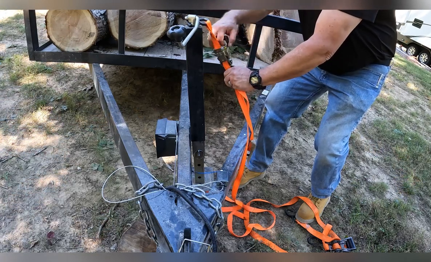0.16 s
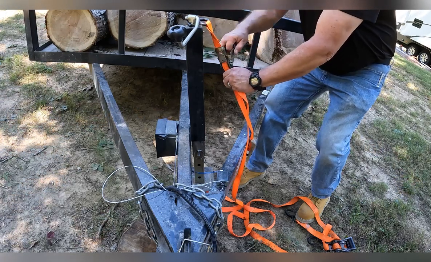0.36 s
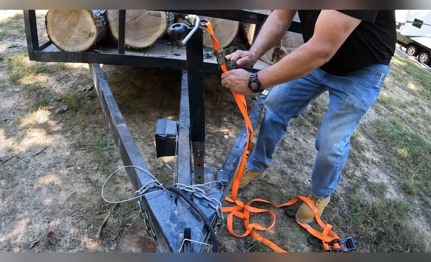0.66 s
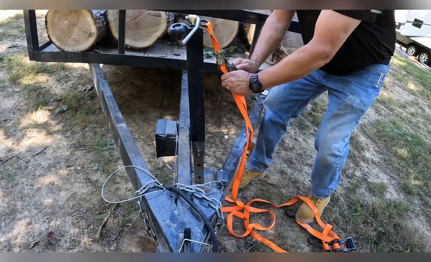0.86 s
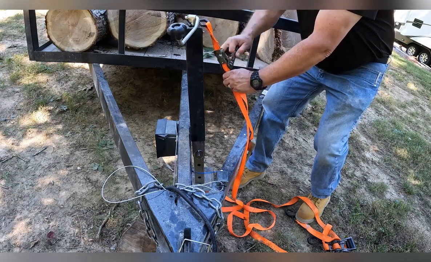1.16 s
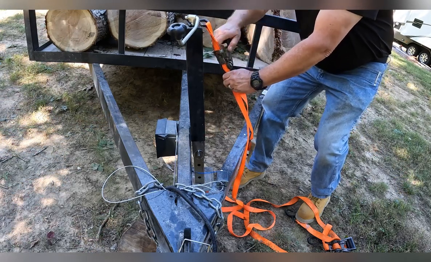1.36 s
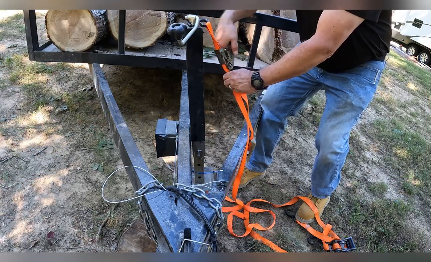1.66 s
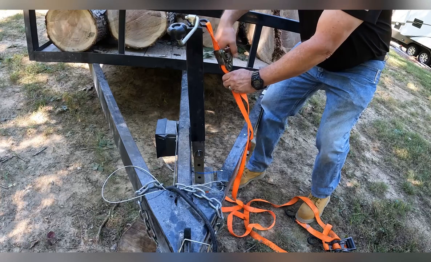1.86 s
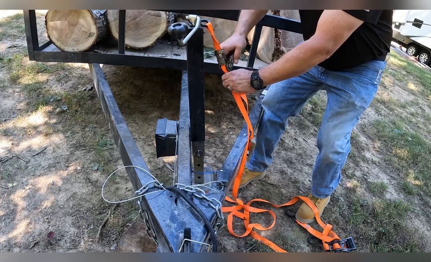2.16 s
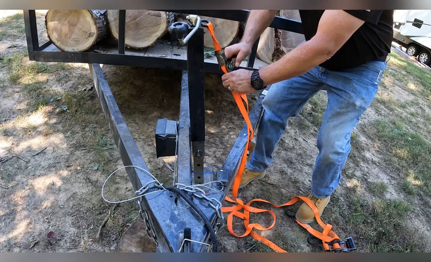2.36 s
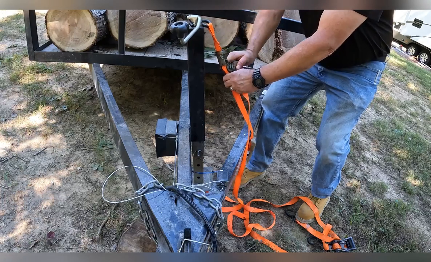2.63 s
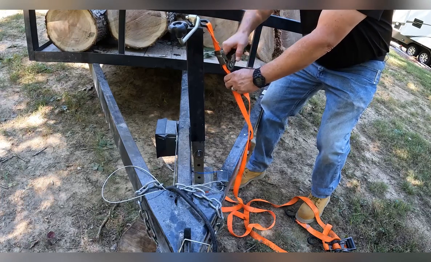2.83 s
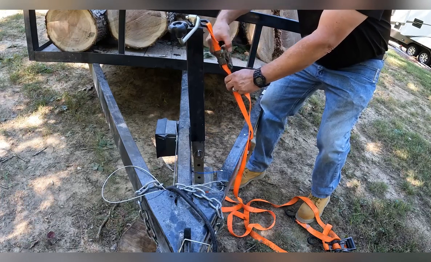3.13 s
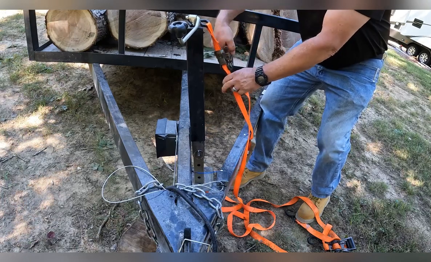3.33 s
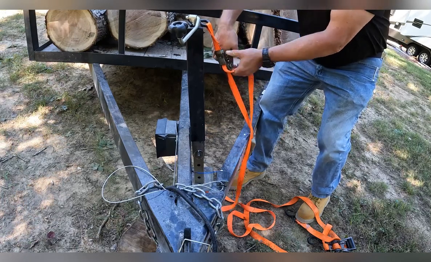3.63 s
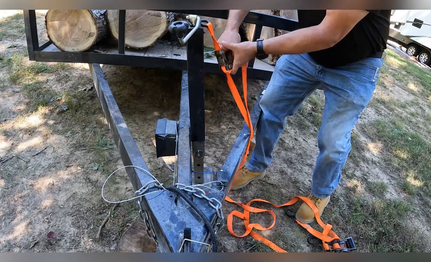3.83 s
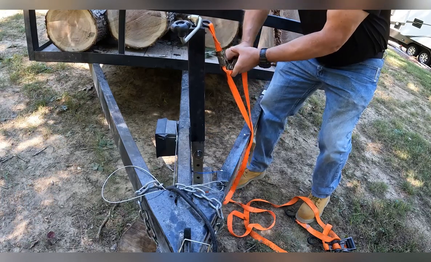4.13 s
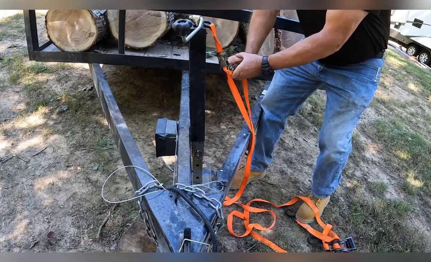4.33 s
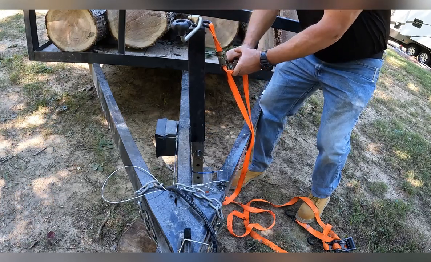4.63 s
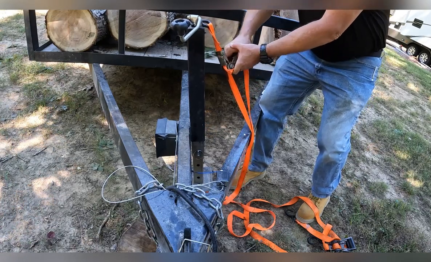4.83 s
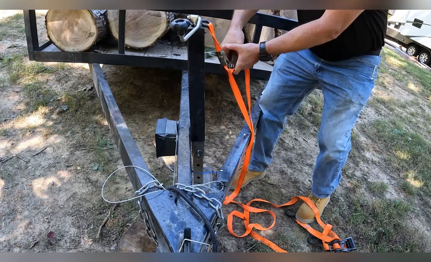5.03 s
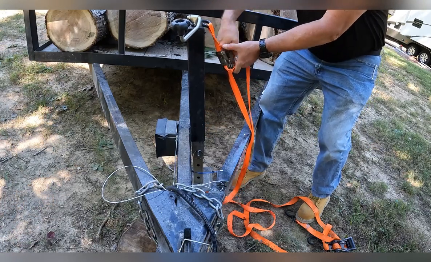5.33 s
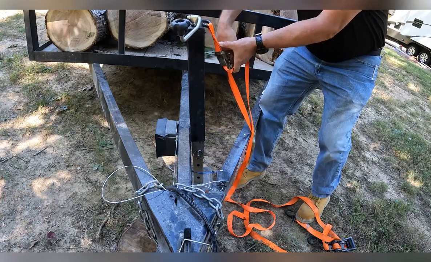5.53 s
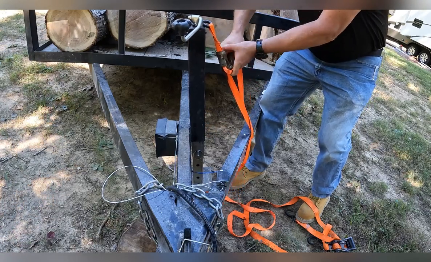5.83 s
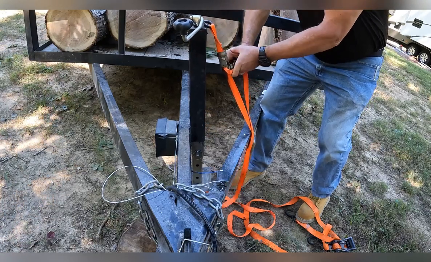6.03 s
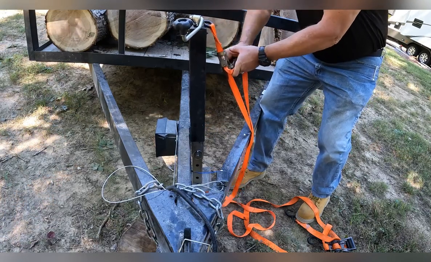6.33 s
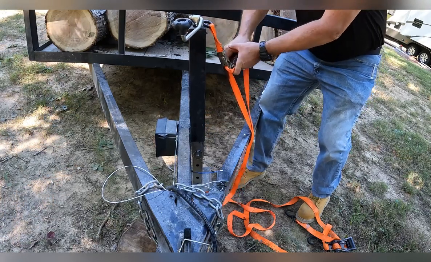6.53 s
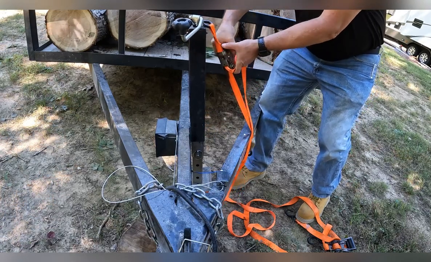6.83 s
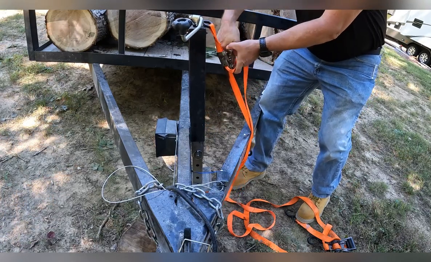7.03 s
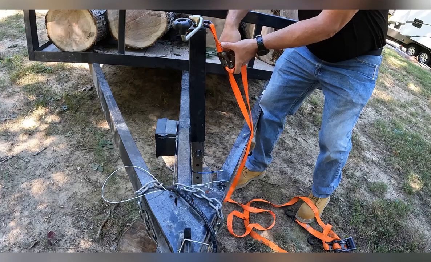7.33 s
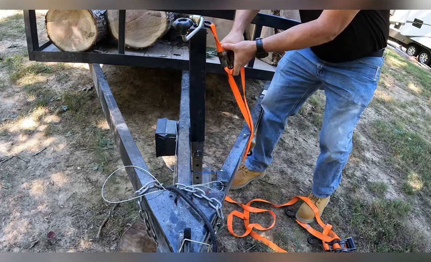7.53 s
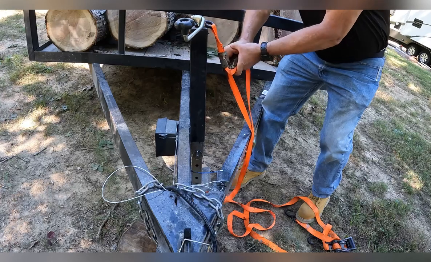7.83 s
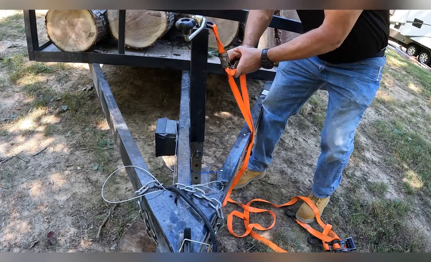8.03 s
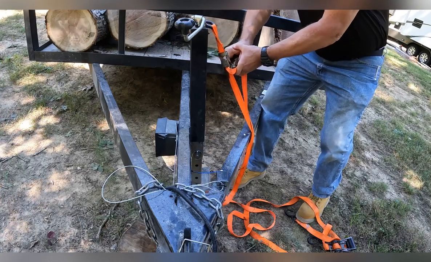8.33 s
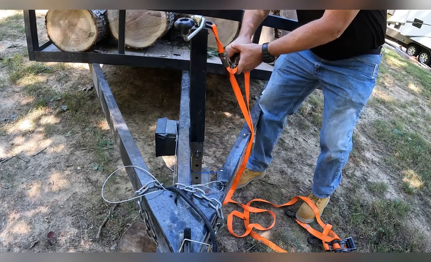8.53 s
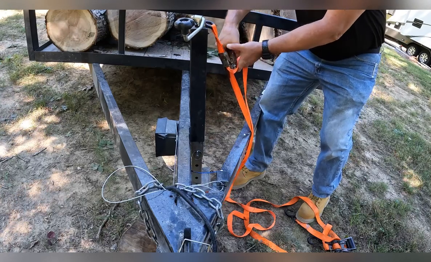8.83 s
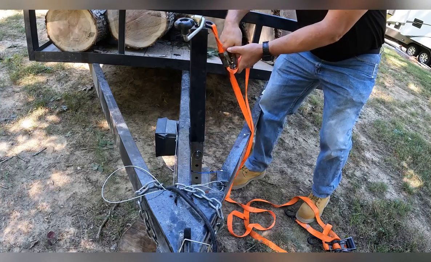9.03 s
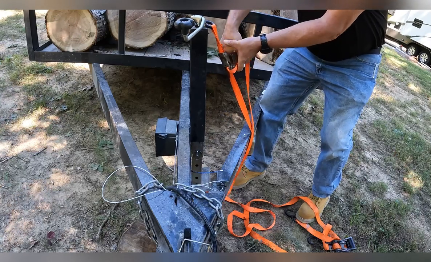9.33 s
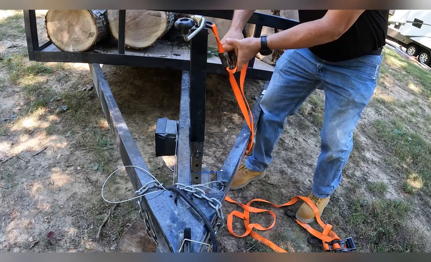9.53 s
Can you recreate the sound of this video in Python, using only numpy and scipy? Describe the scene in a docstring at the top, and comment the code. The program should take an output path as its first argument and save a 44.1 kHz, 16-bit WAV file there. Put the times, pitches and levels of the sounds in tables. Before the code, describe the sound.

Outdoors, about a metre from the microphone, a ratchet strap is tightened on a log trailer. A short scuff and two quick steel clicks lead to single clicks roughly a second apart, some doubled. Later ones shake the trailer with dull clanks and rough strap twangs, with small ticks and handle knocks between. Wind thumps the microphone in bursts over a faint distant hum and thin insect trill.

```python
"""A short scuff and two sharp steel clicks, then more clicks at a slower pace: a ratchet strap is cranked
tight on a log trailer, outdoors, about a metre from the microphone. Pawls snapping over the teeth are noise
bursts and damped modes of the steel buckle; each snap also shakes the strap and the trailer frame, which ring.
Gusts buffet the microphone as low noise and swings of pressure with flutter. Far off, a machine hums on two
notes and insects trill and rasp faintly over soft outdoor noise."""
import sys
import numpy as np
from scipy import signal
from scipy.fft import rfft, irfft, next_fast_len
from scipy.io import wavfile
from scipy.ndimage import uniform_filter1d

SR = 44100
rng = np.random.default_rng(int(sys.argv[2]) if len(sys.argv) > 2 else 0)


def int16_out(signal):
    """Quantize to a 16-bit WAV file."""
    q = np.round(np.clip(np.atleast_2d(signal).T, -1, 1) * 32767)
    wavfile.write(sys.argv[1], SR, q.astype(np.int16))


N = 426888
TIME = np.arange(N) / SR  # seconds
AGE = np.arange(SR // 2) / SR  # seconds since a blow

# The ratchet passes a tooth. Each row: time in seconds, relative level in dB, treble in dB, lag of the second
# pawl in seconds, relative jolt to the frame in dB, scrape up the tooth relative to the click in dB,
# three notes of the buckle in Hz with the strongest first, hollow note of the handle in Hz.
TEETH = [(0.0842, -17.5, 7.2, 0.00072, -48, -19, 4250, 6440, 3360, 1290),
         (0.1645, -19.5, 7.1, 0.00062, -45.5, -26.5, 5380, 4370, 6670, 1260),
         (0.4905, -19, 4.2, 0.0023, -43, -30.5, 6400, 4840, 3210, 1266),
         (0.7734, -20.5, 3.5, 0.0091, -41, -32, 5300, 7364, 2900, 1036),
         (1.2205, -19, 7.4, 0.00087, -47.5, -23.5, 3210, 4510, 2060, 1280),
         (1.3065, -18.5, 7.6, 0.0011, -47, -26, 7440, 3820, 4870, 1130),
         (2.236, -18.5, 3.4, 0.0071, -39.5, -34.5, 4720, 3390, 4480, 1300),
         (3.138, -20, 1.6, 0.00029, -48.5, -22, 3270, 4200, 2150, 1550),
         (4.102, -19, 6.9, 0.011, -37.5, -27, 4630, 4920, 2360, 1177),
         (5.163, -18, 5.7, 0.00059, -34.5, -23.5, 4544, 7320, 2510, 1012),
         (6.008, -19.5, 4, 0.013, -35, -35, 4600, 4300, 4000, 1075),
         (6.815, -18.5, 3.24, 0.00046, -39, -21.5, 4080, 5430, 2420, 1250),
         (8.0044, -20.5, 3.1, 0.023, -34, -26, 4750, 2235, 6380, 1268),
         (8.8666, -18.5, 0.98, 0.00062, -37.5, -21, 4100, 3500, 2940, 1264)]
# Dense modes of the steel buckle. Each row: frequency in Hz, relative level in dB per Hz.
BUCKLE = [(300, -22.5), (700, -46), (1200, -7.5), (1700, -8), (2300, -1.5), (3300, 0.5), (4800, 6.5),
          (7200, 6.5), (8800, -0.5), (10200, 7.5), (11500, -3), (13500, -10), (16000, -51)]
# Dense clank of the trailer frame. Each row: frequency in Hz, relative level in dB per Hz.
FRAME = [(150, -29), (450, 4.5), (700, -1.5), (1200, 2), (1700, -5.5), (2300, -2.5), (3200, -8),
         (4600, -19), (12000, -48)]
# Wind strength. Each row: time in seconds, relative level in dB.
GUST = [(0.0, -43.5), (0.19, -39.5), (1.16, -44), (1.48, -20), (1.53, -32.5), (1.78, -20), (1.89, -23),
        (2.13, -48), (2.48, -29.5), (2.61, -38), (2.8, -35), (3.61, -49), (6.52, -45.5), (7.87, -32.5),
        (7.98, -20.5), (8.06, -36.5), (8.57, -25), (9.1, -29), (9.55, -32), (9.68, -37)]


def ratchet(click_db=-2.5, ride_s=0.011, first_db=-4.0, first_treble_db=-6,
            notes_db=-6, note_step_db=-1.0, notes_t60=0.026,
            bounce_db=-4, bounce_treble_db=-13, bounce_share=.72, bounce_needs_s=.01, grind_db=-5):
    """Two pawls scrape up each tooth and drop, the first duller; far apart, the first grinds and bounces."""
    sing_db, sing_t60 = -7, .14  # a hard jolt keeps the strongest note singing
    out = np.zeros(N)
    for s, db, treble_db, lag, jolt_db, ride_db, *notes, _ in TEETH:
        # handle angle and grip decide which notes of the buckle ring out
        clink = [(hz, db + notes_db + k * note_step_db, notes_t60) for k, hz in enumerate(notes)]
        singing = (notes[0], jolt_db + sing_db, sing_t60)
        add(out, s - 0.56 * ride_s, amp(db + ride_db) * scrape(ride_s))
        add(out, s, amp(db + first_db) * snap(treble_db + first_treble_db, 1))
        add(out, s + lag, amp(db + click_db) * snap(treble_db, 1))
        add(out, s + lag, ring(clink + [singing], detune=0, scatter_db=1))
        if lag > bounce_needs_s:
            bounce = snap(treble_db + bounce_treble_db, 0.35)
            add(out, s, amp(db + grind_db) * focus(scrape(ride_s / 2), notes[0]))
            add(out, s + bounce_share * lag, amp(db + bounce_db) * bounce)
    return out


def snap(treble_db, hardness, crack_t60=0.019, body_t60=0.055, body_db=-9, damping=0.69,
         rise_s=0.000087, soft_s=0.00016, modes_db=-4, colour_db=0.0, shelf_hz=4200, full_hz=10000):
    """Steel meets steel: a crack, then the hand-damped buckle rings; soft contacts rise slower and crack less."""
    # Modes that stand out. Each row: frequency in Hz, relative level in dB, decay time t60 in seconds.
    buckle_modes = [(2275, -15, .05), (3300, -10, .04), (4275, -15, .04), (4760, -14, .035),
                    (6405, -13, .04), (7040, -15, .04), (10090, -11, .035)]
    shelf = [(shelf_hz, 0), (full_hz, treble_db)]
    # colour_db sets how far the balance of the modes varies from blow to blow
    colour = [(hz, db + at(shelf, hz) + colour_db * chance)
              for (hz, db), chance in zip(BUCKLE, rng.standard_normal(len(BUCKLE)))]
    damped = [(hz, db - damping * 20 * np.log10(hz)) for hz, db in colour]
    shelved_modes = [(hz, db + at(shelf, hz), t60) for hz, db, t60 in buckle_modes]
    crack = noise(colour, len(AGE)) * fade(crack_t60)
    body = noise(damped, len(AGE)) * fade(body_t60)
    modes = ring(shelved_modes, detune=0.02, scatter_db=4.0)
    onset = 1 - np.exp(-AGE / (rise_s + soft_s * (1 - hardness)))
    x = (hardness * crack + amp(body_db) * (body + amp(modes_db) * modes)) * onset
    return x / x[AGE < .004].std()  # rms 1 over the first 4 ms


def scrape(length, colour=BUCKLE, grain_db=5.5, dull=1.2):
    """Steel and webbing rub or chatter: a swell of uneven grains with the colour of the part; rms 1."""
    size = int(length * SR)
    grains = np.repeat(amp(grain_db * rng.standard_normal(len(AGE))), 40)[:size]  # 40 samples a grain
    tilted = [(hz, db - dull * 20 * np.log10(hz)) for hz, db in colour]
    x = noise(tilted, len(AGE))[:size] * grains * np.hanning(size)
    return x / x.std()


def focus(x, hz, q=2.3, broad_db=-12):
    """A small part colours a light contact with its own broad resonance; the level is kept."""
    y = signal.lfilter(*signal.iirpeak(hz, q, fs=SR), x) + amp(broad_db) * x
    return y * x.std() / y.std()


def trailer(frame_db=2.5, rise_s=.005, rail_db=-20, hollow_db=-1):
    """Every tooth jolts handle and trailer as the second pawl drops; the jolts are harder once the strap is taut."""
    out = np.zeros(N)
    for s, _, _, lag, db, *_, hollow_hz in TEETH:
        shake = amp(frame_db) * jolt(rise_s) + amp(hollow_db) * hollow(hollow_hz) + amp(rail_db) * rail(0)
        add(out, s + lag, amp(db) * shake)
    return out


def jolt(rise_s, frame_t60=0.14, modes_db=-7, thud_db=-9, thud_t60=0.52, thud_rise_s=0.01):
    """A jolt runs down the webbing: the frame clanks, its modes ring on, and the load gives a rough low thud."""
    # Modes of the frame. Each row: frequency in Hz, relative level in dB, decay time t60 in seconds.
    frame_modes = [(778, -12, .17), (1030, -8, .13), (2020, -5, .14), (2150, -5, .12), (2290, -2, .09),
                   (2400, -4, .16), (2930, -7, .12)]
    # Low thud of the load. Each row: frequency in Hz, relative level in dB per Hz.
    thud_colour = [(220, -17), (330, -1), (480, 2.5), (620, -8.5), (900, -12), (2000, -58)]
    modes = amp(modes_db) * ring(frame_modes, detune=0.004, scatter_db=3.5)
    clank = (noise(FRAME, len(AGE)) * fade(frame_t60) + modes) * (1 - np.exp(-AGE / rise_s))
    thud = noise(thud_colour, len(AGE)) * fade(thud_t60) * held(thud_rise_s)
    return clank + amp(thud_db) * thud


def hollow(hz):
    """The short hollow note of the pressed-steel handle; the grip sets its pitch."""
    # Each row: multiple of the pitch, relative level in dB, decay time t60 in seconds.
    handle_modes = [(1, -1.5, 0.099), (.78, -9.5, 0.076)]
    return ring([(hz * ratio, db, t60) for ratio, db, t60 in handle_modes], detune=0.008, scatter_db=4)


def rail(tilt_db):
    """The long ring of the trailer's steel rail, tilted by so many dB an octave about its main note."""
    # Main note first. Each row: frequency in Hz, relative level in dB, decay time t60 in seconds.
    rail_modes = [(1766, -.5, .35), (560, 3, .22), (1453, -6, .52), (3714, -2.5, .3)]
    main_hz = rail_modes[0][0]
    tilted = [(hz, db + tilt_db * np.log2(hz / main_hz), t60) for hz, db, t60 in rail_modes]
    return ring(tilted, detune=0, scatter_db=1.5)


def strap(rise_s=0.0051, t60=0.52, edge_ratio=.92, edge_db=-8):
    """The taut webbing twangs roughly; its slacker edge beats against the main note until the hand stops both."""
    # Each row: time in seconds, relative level in dB, pitch in Hz.
    twangs = [(0.784, -46, 435), (4.113, -37, 452), (5.164, -36, 432), (5.33, -47, 421), (6.02, -44, 450),
              (6.817, -46.5, 426), (7.008, -48.5, 453), (8.027, -43, 462), (8.402, -41.5, 459),
              (8.867, -43, 470)]
    out = np.zeros(N)
    for s, db, hz in twangs:
        notes = [(hz, db, t60), (hz * edge_ratio, db + edge_db, t60)]
        add(out, s, ring(notes, detune=0, scatter_db=1.5) * held(rise_s))
    return out * (1 + .4 * walk(150))  # roughness


def held(rise_s, grip_s=.085):
    """The webbing takes up a blow gradually, and the hand soon stops it."""
    return (1 - np.exp(-AGE / rise_s)) ** 2 * np.exp(-(AGE / grip_s) ** 4)


def handle(tick_db=-3.0, click_db=-4.0, knock_db=2, knock_rise_s=0.0016, scuff_db=-3,
           chatter_db=-3, seats_share=0.29):
    """Between teeth the buckle ticks, the handle chatters against its stop until it seats, and the grip shifts."""
    # Loose parts of the buckle tick. Each row: time in seconds, relative level in dB, resonance in Hz.
    ticks = [(.282, -38, 4550), (0.323, -38.5, 3910), (1.1045, -45.5, 4150), (1.3956, -41, 3500),
             (1.4239, -39, 3000), (2.7223, -33, 4750), (3.197, -40.5, 2700), (4.365, -43, 3550),
             (4.622, -30, 4830), (4.6813, -40.5, 4740), (4.999, -40, 3020), (6.3955, -46, 6000),
             (6.689, -46, 4000)]
    # The handle knocks against its stop. Each row: time in seconds, then relative levels in dB of the steel
    # click, the jolt to the frame and the handle's hollow note, that note's pitch in Hz, chatter in seconds.
    knocks = [(2.8252, -42.5, -56, -62, 1100, .01), (5.329, -37.5, -46, -46, 820, .026),
              (6.2, -51, -42, -49, 1500, .012), (7.007, -38, -51, -48, 1200, .01),
              (7.374, -38.5, -58, -47, 1180, .008), (7.4585, -41, -54, -53, 1100, .01),
              (7.9333, -34, -58, -51, 1400, .008), (8.187, -43.5, -40, -46, 1680, .012),
              (8.315, -32, -58, -52, 1250, .01), (8.389, -35, -35, -40, 620, .036),
              (9.027, -35, -48, -44, 1450, .012)]
    # Handle and webbing scrape as the grip shifts. Each row: middle in seconds, relative level in dB,
    # length in seconds, resonance in Hz.
    scuffs = [(0.06, -45.5, 0.055, 3440), (0.475, -43.5, 0.022, 5000), (2.959, -47.5, 0.027, 2630),
              (5.142, -48.5, 0.036, 3960), (5.98, -46, 0.032, 4480), (6.983, -45.5, 0.076, 2600),
              (9.008, -49, 0.035, 3300)]
    rail_db, hard_db, tilt_per_db = -11, -35, .3  # the rail rings duller when the steel meets softly
    out = np.zeros(N)
    for s, db, hz in ticks:
        add(out, s, amp(tick_db) * rattle(db, hz))
    for s, steel_db, frame_db, hollow_db, hollow_hz, length in knocks:
        add(out, s, amp(click_db) * tick(steel_db) + amp(hollow_db) * hollow(hollow_hz))
        chatter = scrape(length, FRAME, grain_db=3.5, dull=-0.81)
        add(out, s, amp(frame_db + chatter_db) * chatter)
        ringing = rail(tilt_per_db * (steel_db - hard_db))
        seated = amp(knock_db) * jolt(knock_rise_s) + amp(rail_db) * ringing
        add(out, s + seats_share * length, amp(frame_db) * seated)
    for s, db, length, hz in scuffs:
        add(out, s - length / 2, amp(db + scuff_db) * focus(scrape(length), hz))
    return out


def tick(db, treble_db=-8, soft_db=-42, hard_db=-25):
    """A light touch of steel on steel: the weaker, the softer the contact."""
    return amp(db) * snap(treble_db, np.interp(db, [soft_db, hard_db], [0, 1]))


def rattle(db, hz, again_s=.005, again_db=-6):
    """A loose part touches, then bounces once, softer and lower."""
    out = focus(tick(db), hz, broad_db=-1.5)
    bounce = focus(tick(db + again_db), hz / 2)
    add(out, again_s * (.5 + rng.random()), bounce[:len(out) // 2])
    return out


def ports(x):
    """Direct sound reaches the two microphone ports with slightly different level and phase."""
    # Each row: frequency in Hz, left minus right in dB.
    balance = [(700, -0.8), (4400, -1.3), (15000, 0.75)]
    # Each row: frequency in Hz, phase by which the left leads in radians.
    phase = [(300, -0.32), (1500, -0.49), (12000, -0.51)]
    n = next_fast_len(N)
    hz = np.fft.rfftfreq(n, 1 / SR)
    half = amp(at(balance, hz) / 2) * np.exp(.5j * at(phase, hz))  # each port takes half the difference
    return irfft(rfft(x, n) * np.array([half, 1 / half]), n)[:, :N]


def yard(x, wet_db=-25, t60=0.34, rise_s=0.0082):
    """Logs, ground and trees scatter a thin tail, different at each port."""
    # The open yard's answer. Each row: frequency in Hz, relative level in dB per Hz.
    answer = [(300, 1.5), (1200, 8.5), (2500, -1.5), (5000, 1), (7500, -4.5), (11000, -8), (16000, -31)]
    shape = fade(t60) * (1 - np.exp(-AGE / rise_s))
    tails = [noise(answer, len(AGE)) * shape for _ in range(2)]
    return amp(wet_db) * np.array([signal.fftconvolve(x, h / np.linalg.norm(h))[:N] for h in tails])


def wind(rumble_db=-1.0, rumble_top_db=-25, eddy_db=0, cycles=0.51, flutter_apart=0.39,
         kink_db=12, kink_s=0.0016, side_db=-5, flutter_db=-1.5, flutter_s=.018):
    """Rumble follows the gusts; eddies are round swings of pressure, kinked and fluttering when rough."""
    # The strongest eddies at the microphone. Each row: time in seconds, relative peak in dB,
    # frequency in Hz, relative flutter in dB.
    strong_eddies = [(0.187, -22, 35.2, -59), (1.427, -14, 62.5, -45), (1.477, -13.5, 82.5, -31),
                     (1.718, -13.5, 69, -31), (1.766, -10.5, 59.6, -34), (1.893, -12.5, 75.5, -35.5),
                     (2.239, -20.5, 43, -62), (2.49, -14, 73, -38), (6.935, -25.5, 70, -52),
                     (7.977, -15.5, 63, -36), (8.241, -20.5, 86.4, -33.5), (8.541, -13.5, 50, -30.5),
                     (8.697, -16.5, 77, -28.5), (8.769, -18, 70.4, -33.5), (9.067, -17, 94, -28.5),
                     (9.136, -15.5, 110, -27.5), (9.207, -18.5, 70, -35), (9.362, -20.5, 85, -37.5),
                     (9.489, -21, 75, -36.5)]
    # Rumble. Each row: frequency in Hz, relative level in dB per Hz.
    rumble_colour = [(12, -5), (28, 4.5), (55, -3.5), (100, -9.5), (200, -25), (330, -42), (700, -73.5),
                     (2000, -91.5)]
    # Flutter of an eddy at the port. Each row: frequency in Hz, relative level in dB per Hz.
    flutter_colour = [(50, -23), (110, -4), (190, 7.5), (300, -10), (450, -26), (1100, -84)]
    pop_s, pop_db, pop_hz = 1.767, -29, 494  # the strongest eddy pops at the port
    gust_db = np.interp(TIME, *np.transpose(GUST)) + rumble_db
    rumble = stereo_noise(rumble_colour, apart=0.17) * amp(np.minimum(gust_db, rumble_top_db))
    thumps, flutter_power = np.zeros(N), np.zeros(N)
    lead = AGE.mean() / 2
    t = AGE - lead  # seconds from the core of the eddy
    for s, db, hz, rough_db in strong_eddies + small_eddies():
        start = max(s - lead, 0)
        swing = np.cos(2 * np.pi * (hz * t + rng.random())) * np.exp(-(hz * t / cycles) ** 2)
        turn = np.exp(2j * np.pi * rng.random())  # random shape of the kink
        kink = (turn / (1 - 1j * t / kink_s) / (1 - .5j * t / kink_s)).real
        burst = amp(rough_db + flutter_db) * np.exp(-(t / flutter_s) ** 2)
        add(thumps, start, amp(db + eddy_db) * swing + amp(rough_db + kink_db) * kink)
        add(flutter_power, start, burst ** 2)
    pop = np.sin(2 * np.pi * pop_hz * t) * np.exp(-(pop_hz * t) ** 2)
    add(thumps, pop_s - lead, amp(pop_db) * pop)
    flutter = np.sqrt(flutter_power) * stereo_noise(flutter_colour, flutter_apart)
    return (rumble + thumps + flutter) * pan(side_db)


def small_eddies(count=110, over_gust_db=0.0, scatter_db=1.5, ceiling_db=-22, hz=65, octaves=0.72,
                 flutter_db=-6, flutter_growth=1.365):
    """Lesser eddies come at random, as strong as the gust that carries them; rows as for the strong eddies."""
    place, size, pitch = rng.random((count, 3)).T
    s = place * TIME[-1]
    gust_db = np.interp(s, *np.transpose(GUST))
    db = np.minimum(gust_db + over_gust_db + scatter_db * (2 * size - 1), ceiling_db)
    return list(zip(s, db, hz * 2 ** (octaves * (2 * pitch - 1)), flutter_growth * db + flutter_db))


def hum(mains_db=-45.5, drift=0.006, waver_db=2.5, octave_db=-21):
    """A distant machine: a steady mains note, and a running note that wavers in pitch and level, with its octave."""
    # The running note swells and fades. Each row: time in seconds, relative level in dB.
    swell = [(0, -67), (.7, -54.5), (1.3, -47.5), (2.7, -50), (3.2, -59.5), (3.6, -49.5), (4.9, -54.5),
             (6.5, -48.5), (7.4, -51.5), (8.3, -42), (9.4, -44.5), (9.68, -52)]
    mains_hz, motor_hz = 120.15, 153.7
    level = amp(np.interp(TIME, *np.transpose(swell)) + waver_db * walk(9))
    phase = 2 * np.pi * np.cumsum(motor_hz * (1 + drift * walk(4))) / SR
    running = level * (np.sin(phase) + amp(octave_db) * np.sin(2 * phase))
    mains = amp(mains_db) * np.sin(2 * np.pi * mains_hz * TIME)
    return np.sqrt(2) * (mains + running)


def insects(trill_hz=7700, arch_hz=700, rate=28.0, rasp_db=-72, flicker_db=3):
    """One insect trills in little arches of pitch, rate a second; others rasp higher up in uneven spurts."""
    arch = np.abs(np.sin(np.pi * np.cumsum(rate * (1 + 0.0095 * walk(1.4))) / SR))
    pitch = trill_hz + arch_hz * arch + 130 * walk(900)
    trill = arch * np.sin(2 * np.pi * np.cumsum(pitch) / SR) * amp(-73 + 2 * walk(120))
    rasp_colour = [(8500, -2.0), (9500, -3.0), (10200, 4.5), (11200, -5.0), (13500, -14.5), (15000, -19.5)]
    rasp = stereo_noise(rasp_colour, apart=0.53)
    return trill + rasp * amp(rasp_db + flicker_db * walk(22) + 2 * walk(1.7))


def background(air_db=-53):
    """Far outdoor noise, steady and partly shared by left and right."""
    # Each row: frequency in Hz, relative level in dB per Hz.
    air = [(20, 5), (80, -11.5), (200, -3), (280, -9), (450, -11), (780, -21), (1200, -13), (2000, -16.5),
           (3300, -17.5), (5500, -23.5), (7800, -26.5), (9000, -76), (13500, -46), (15000, -85)]
    return stereo_noise(air, apart=0.54) * amp(air_db)


def amp(db):
    """Decibels to gain."""
    return 10 ** (np.asarray(db) / 20)


def at(points, hz):
    """Read (Hz, value) points on a log-frequency axis."""
    f, value = np.transpose(points)
    return np.interp(np.log(hz + 1), np.log(f), value)


def noise(points, size):
    """Noise of rms 1 with the given spectrum."""
    n = next_fast_len(size)
    gain = amp(at(points, np.fft.rfftfreq(n, 1 / SR)))
    x = irfft(rfft(rng.standard_normal(n)) * gain, n)[:size]
    return x / x.std()


def stereo_noise(points, apart):
    """Left and right noise; apart is the weight of what they do not share."""
    shared = noise(points, N)
    opposed = np.array([[1], [-1]]) * noise(points, N)
    return (shared + apart * opposed) / np.hypot(1, apart)


def walk(rate):
    """Random levels held 1 / rate s and slewed twice; spread 1."""
    k = int(SR / rate)
    steps = np.repeat(rng.standard_normal(N // k + 1), k)
    x = uniform_filter1d(uniform_filter1d(steps, k), k)[:N]
    return x / x.std()


def pan(db):
    """Gains for a left minus right level."""
    return amp(np.array([[db], [-db]]) / 2)


def fade(t60):
    """Free decay after a blow, down 60 dB in t60 seconds."""
    return np.exp(-np.log(1000) * AGE / t60)


def ring(modes, detune, scatter_db):
    """Damped modes (Hz, dB, t60 s); every blow may find them a little differently tuned and weighted."""
    out = np.zeros(len(AGE))
    for (hz, db, t60), (a, b, c) in zip(modes, rng.standard_normal((len(modes), 3))):
        tone = np.sin(2 * np.pi * (hz * (1 + detune * b) * AGE + c))
        out += amp(db + scatter_db * a) * fade(t60) * tone
    return np.sqrt(2) * out


def add(track, s, sound):
    """Mix a sound in at time s."""
    i = int(s * SR)
    track[i:i + len(sound)] += sound[:len(track) - i] if len(track) == N else sound[:N - i]


def scene():
    """Buckle, strap and trailer up close, in wind, over the sounds of the yard."""
    work = ratchet() + trailer() + strap() + handle()
    distance = background() + hum() + insects()
    return ports(work) + yard(work) + distance + wind()


def record(dry, top_hz=16000):
    """The recorder cuts the top with a steep low-pass."""
    return signal.sosfilt(signal.ellip(8, .2, 80, top_hz, fs=SR, output="sos"), dry)


dry = scene()
out = record(dry)
int16_out(out)
```